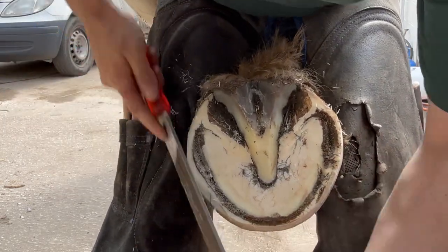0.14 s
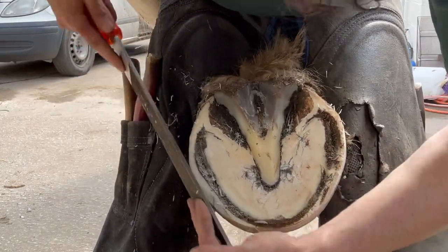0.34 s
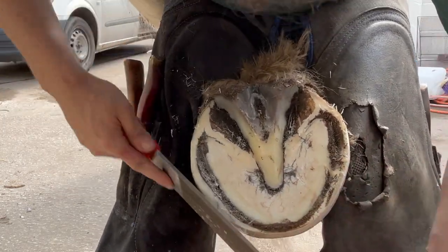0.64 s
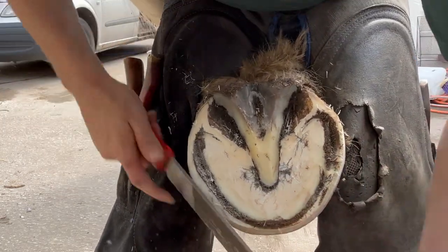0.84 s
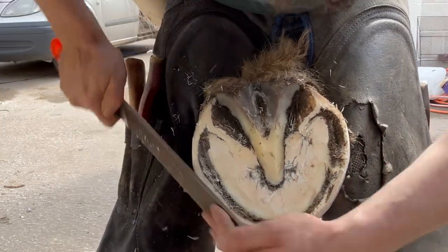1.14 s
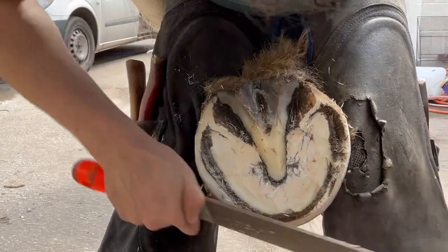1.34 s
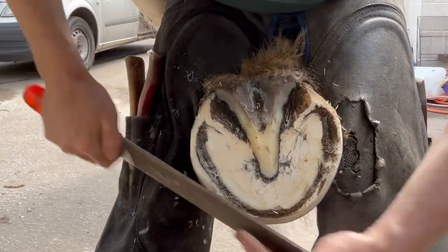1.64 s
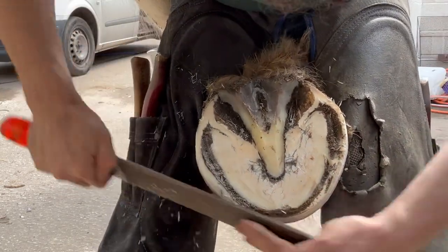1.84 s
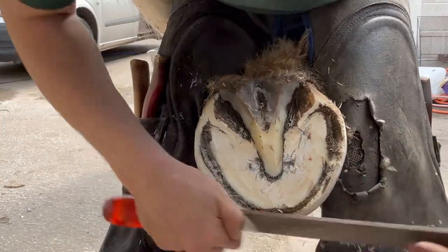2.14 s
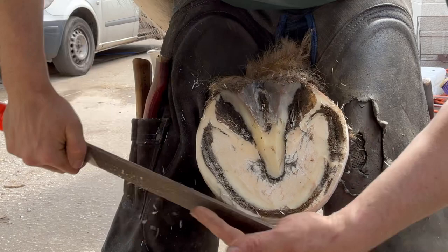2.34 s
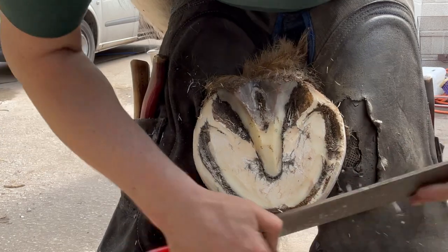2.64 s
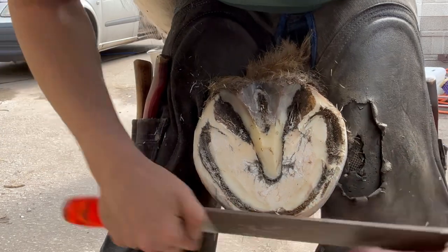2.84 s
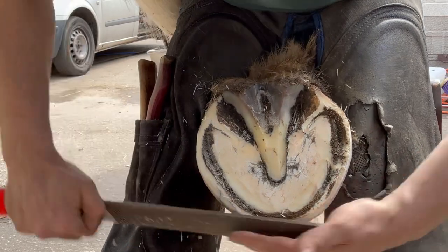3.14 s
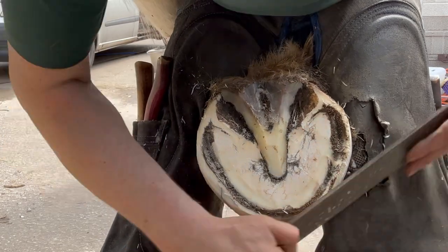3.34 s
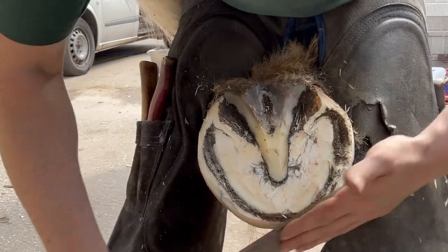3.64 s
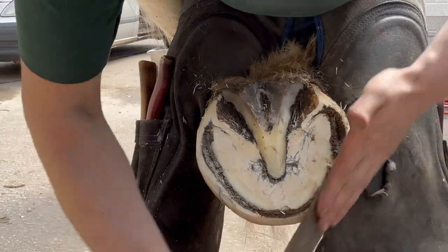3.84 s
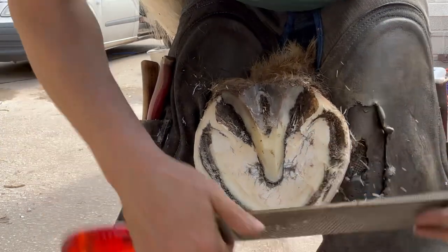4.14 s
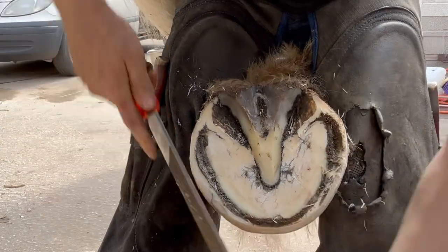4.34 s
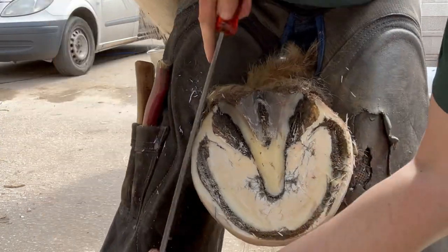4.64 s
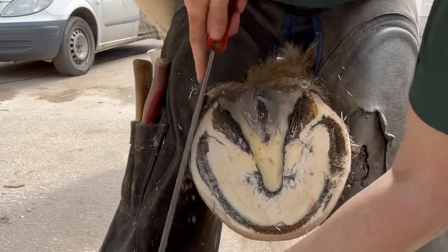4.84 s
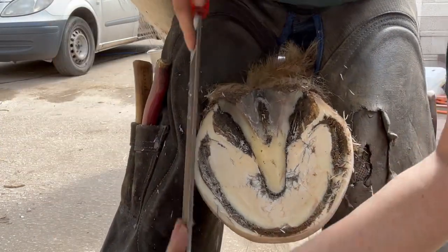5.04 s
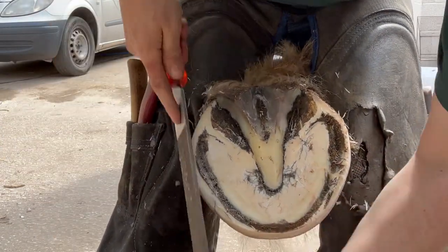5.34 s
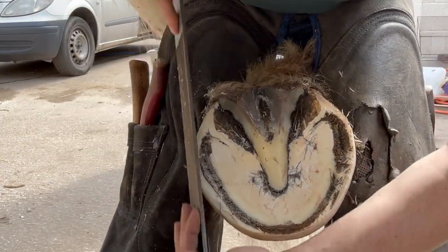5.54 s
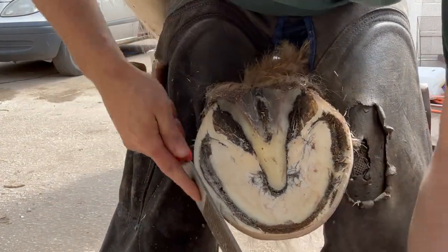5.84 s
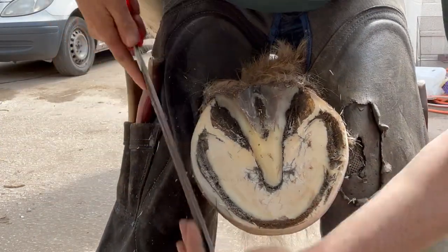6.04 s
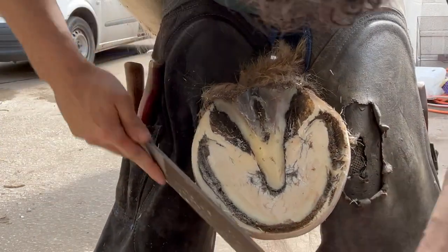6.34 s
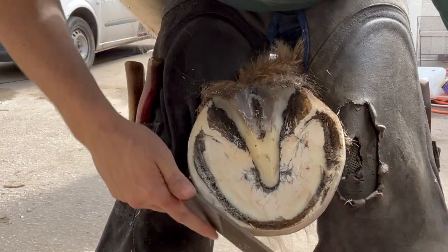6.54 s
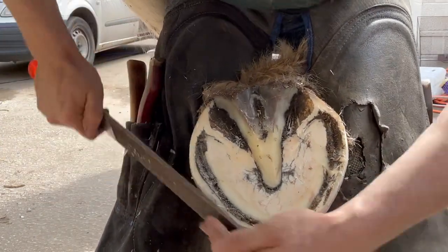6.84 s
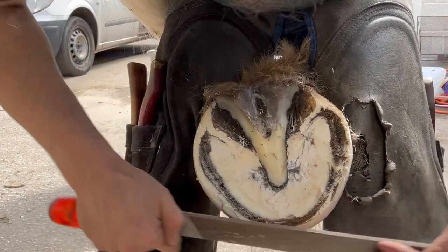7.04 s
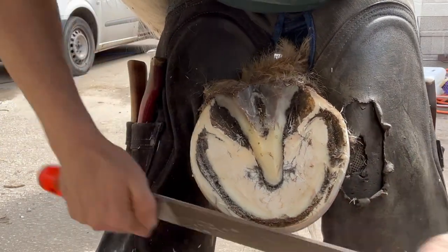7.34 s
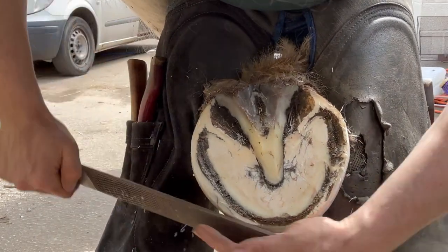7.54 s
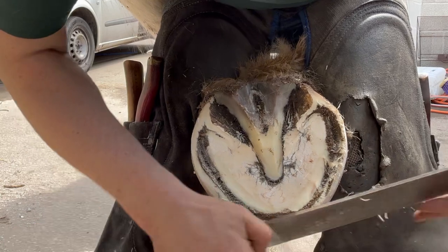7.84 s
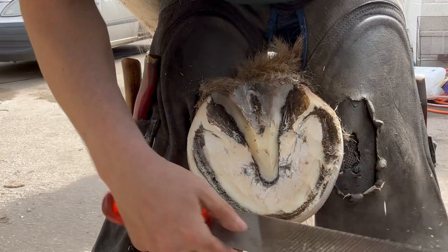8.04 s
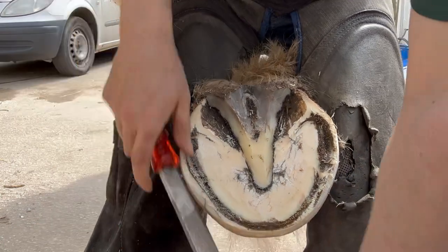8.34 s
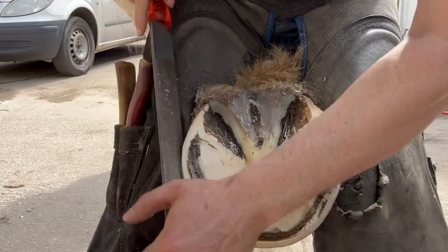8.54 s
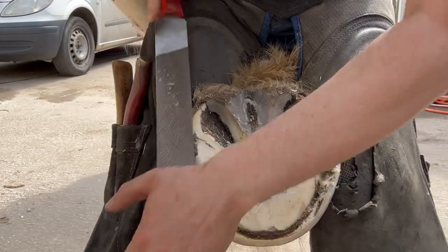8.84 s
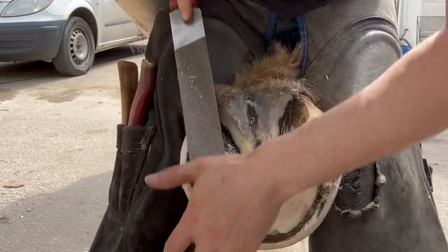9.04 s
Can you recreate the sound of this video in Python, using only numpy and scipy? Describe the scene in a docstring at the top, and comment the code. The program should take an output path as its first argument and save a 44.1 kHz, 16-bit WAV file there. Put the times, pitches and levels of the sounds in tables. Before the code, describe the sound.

Close up in a quiet open yard, a steel rasp files the edge of a horse's hoof. Short rough strokes come first, then longer, brighter, hissing ones, a brief lull, and strong juddering scrapes with low groans. More sweeping strokes follow, ending with knocks, small scrapes and one hard rasp. Shavings and leather rustle faintly. The wide stereo pickup is close, the work slightly right of centre.

```python
"""Open yard: a farrier rasps the wall of a horse's hoof, close by and a little right of centre.
Strokes speed up and slow down: tooth rows judder the hoof, horn fibres snap in dense grains, the blade sings high.
The rasp also taps on the horn, the teeth groan where they catch evenly, and the blade squeals briefly.
The held leg rumbles and heaves, shavings and leather rustle, a faint hum wavers late on; quiet air lies behind."""
import sys
import numpy as np
from scipy import signal
from scipy.fft import rfft, irfft, next_fast_len
from scipy.io import wavfile
from scipy.ndimage import uniform_filter1d, map_coordinates

SR = 44100
rng = np.random.default_rng(int(sys.argv[2]) if len(sys.argv) > 2 else 0)


def transcribe(signal):
    """Save signal, clipped to [-1, 1], as a 16-bit WAV file at the path in sys.argv[1]."""
    frames = np.atleast_2d(signal).T
    limited = np.clip(frames, -1, 1)
    pcm = np.round(limited * 32767).astype(np.int16)
    wavfile.write(sys.argv[1], SR, pcm)


N = 405719

# quiet outdoor air: (frequency [Hz], level [dB])
YARD_SHAPE = [(20, -35), (50, -10), (110, -2.5), (500, -10), (1000, -16), (2000, -22.5), (6000, -30.5),
              (15500, -75)]
# the held leg heaves: (time [s], level [dB])
LEG_HEAVES = [(.9, -52), (2.04, -48), (4.58, -54), (8.17, -48)]
# strokes of the rasp: (start [s], fastest [s], end [s], taper: under 1 flat, over 1 pointed [-], sliding [dB],
# cutting [dB], hiss [dB], judder [dB], hardest grip [s], grip length [s], change of cutting in the grip [dB],
# wall ring at full speed [Hz], wall ring [dB])
RASP_STROKES = [(-0.08, -0.049, 0.088, 2.65, -48.5, -49.5, -60, -46.5, 0.025, 0.078, 0, 2900, -61),
                (0.066, 0.092, 0.13, 0.69, -46.5, -51.5, -70, -52, 0.08, 0.095, 0, 1510, -49),
                (0.302, 0.599, 0.78, 0.38, -45, -48.5, -54.5, -41.5, 0.42, 0.084, -1, 1820, -46.5),
                (0.955, 0.968, 1.061, 1.9, -42.5, -45.5, -53.5, -41.5, 1.0, 0.045, -2, 1290, -65),
                (1.039, 1.232, 1.597, 1.44, -43.5, -48, -52.5, -45, 1.26, 0.055, 5.5, 1370, -45.5),
                (1.391, 1.661, 1.825, 3.12, -47.5, -49, -51, -38.5, 1.645, 0.055, 7.5, 2665, -46.5),
                (1.754, 1.92, 2.055, 1.05, -49.5, -46, -44, -44, 1.96, 0.084, 1, 730, -49.5),
                (2.049, 2.295, 2.375, 1.2, -53.5, -47.5, -46.5, -40, 2.25, 0.07, 1, 413, -48.5),
                (2.355, 2.575, 2.717, 1.14, -53, -46.5, -44, -40.5, 2.62, 0.079, 1.5, 2278, -56),
                (2.764, 2.838, 3.07, 0.94, -50.5, -51, -48.5, -50.5, 2.96, 0.08, 5, 1053, -63),
                (3.042, 3.291, 3.448, 1.52, -46.5, -44.5, -45, -46, 3.32, 0.083, -3.5, 637, -45.5),
                (3.461, 3.646, 3.72, 1.32, -59.5, -53.5, -52, -49.5, 3.56, 0.091, 6.5, 1205, -54.5),
                (3.701, 3.879, 4.077, 2.32, -48.5, -47, -49.5, -50.5, 3.9, 0.082, 0.5, 896.5, -49.5),
                (4.032, 4.169, 4.33, 1.43, -64.5, -66.5, -70.5, -62, 4.08, 0.07, 5.5, 1550, -59),
                (4.564, 4.62, 4.74, 1.43, -53, -53.5, -62.5, -42.5, 4.62, 0.096, 0.5, 1096, -49.5),
                (4.715, 4.747, 4.84, 1.08, -50, -57, -58.5, -43.5, 4.745, 0.048, 0, 2080, -55),
                (4.8, 4.888, 5.06, 2.9, -54.5, -55, -65, -49.5, 4.9, 0.064, -1.5, 1110, -60),
                (5.002, 5.14, 5.315, 1.86, -41.5, -44.5, -50.5, -31, 5.18, 0.092, -3.5, 2183, -61),
                (5.398, 5.43, 5.58, 1.2, -42.5, -47, -58, -44, 5.44, 0.085, -3, 4450, -49.5),
                (5.529, 5.718, 5.886, 1.12, -40, -46, -47.5, -30, 5.73, 0.17, -1, 525, -44.5),
                (5.879, 5.926, 5.94, 1.45, -57, -59.5, -72, -46.5, 5.91, 0.1, 5, 1546, -46.5),
                (6.188, 6.288, 6.58, 0.8, -41.5, -46.5, -51.5, -36, 6.275, 0.065, 1, 404.7, -57),
                (6.546, 6.599, 6.67, 3.3, -55.5, -59.5, -67.5, -51, 6.65, 0.072, -2, 1458, -66),
                (6.754, 6.769, 6.81, 0.86, -52, -51.5, -59.5, -49, 6.77, 0.044, -1, 1302, -65),
                (6.788, 7.061, 7.225, 1.17, -48.5, -44.5, -48, -37, 7.115, 0.051, -1.5, 798.4, -45.5),
                (7.225, 7.379, 7.52, 1.26, -71.5, -46.5, -50.5, -48, 7.37, 0.2, -0.5, 3002, -52.5),
                (7.525, 7.698, 7.96, 1.44, -50, -43, -47, -47.5, 7.7, 0.11, -3.5, 704.7, -50.5),
                (8.029, 8.21, 8.63, 1.51, -58, -61, -94, -49.5, 8.18, 0.092, 5.5, 2226, -55.5),
                (8.374, 8.388, 8.43, 0.59, -43.5, -44, -58, -50, 8.39, 0.032, 2, 1130, -42.5),
                (8.432, 8.491, 8.56, 0.98, -47, -45.5, -59, -52, 8.49, 0.049, 1.5, 2660, -49),
                (8.487, 8.511, 8.74, 1.5, -54, -57, -79, -37, 8.53, 0.11, 2.5, 1050, -43),
                (8.549, 8.656, 8.9, 1.78, -59, -61.5, -79, -42.5, 8.68, 0.13, -3.5, 337, -50),
                (8.752, 8.87, 8.98, 0.96, -61, -58.5, -70, -44, 8.82, 0.08, -3, 920, -55.5),
                (8.99, 9.145, 9.24, 1.58, -42.5, -39, -46.5, -33.5, 9.15, 0.038, 6, 1128, -38)]
# judder and thud of the hoof: (frequency [Hz], level [dB])
HOOF_SHAPE = [(40, -69.5), (80, -1), (125, 3.5), (230, 3), (450, -3), (700, -7.5), (1100, -22), (2500, -42),
              (6000, -103)]
# sliding on the hollow band of the hoof wall: (frequency [Hz], level [dB])
SLIDE_SHAPE = [(150, -62), (450, -6.5), (750, -11), (1050, -2), (1300, 4.5), (1550, 7.5), (1880, 3),
               (2250, -6.5), (3500, -31), (8000, -71)]
# cutting of the horn: (frequency [Hz], level [dB])
CUT_SHAPE = [(300, -23.5), (720, -0.5), (1100, -9), (1900, 3), (2700, -0.5), (3500, 1), (4500, -1.5),
             (5900, -6), (6600, -5.5), (7400, -12.5), (9500, -17.5), (15000, -14.5)]
# hiss of the rasp, also the rustle: (frequency [Hz], level [dB])
HISS_SHAPE = [(3000, -24), (6000, -6.5), (8300, -10), (10500, -8), (11700, -5.5), (12800, 1.5),
              (14500, -11.5), (15800, -4)]
# bending modes of the steel blade: (frequency [Hz], width [Hz], level [dB])
BLADE_MODES = [(2050, 29, -11.5), (4422, 71, -10), (5557, 181, -12.5), (6540, 110, -11), (12590, 95, -14),
               (13985, 110, -20)]
# two high modes that the blade sings on: (frequency [Hz], width [Hz], level [dB])
SINGING_MODES = [(11536, 24, 7), (12005, 24, 3)]
# echoes along the blade: (delay [s], strength [-])
BLADE_ECHOES = [(.00032, .35), (.0017, .45)]
# overtones of the hoof's swing, from the second harmonic up: level [dB]
SWING_OVERTONES_DB = [-14.5, -18, -27]
# the rasp landing on the horn: (time [s], level [dB], then before trims: thud [dB], knock [dB], crack [dB])
RASP_TAPS = [(0.243, -23.5, -39, -27, -7.5), (0.265, -38, -17, -18, -5), (0.866, -33.5, -20, -21, -16),
             (0.878, -31.5, -15, -27, -19), (0.965, -46, -26, -30, -12), (2.776, -41, -36, -13, -13),
             (3.493, -42.5, -15, -13, -9), (4.52, -41, -15, -12.5, -12.5), (4.736, -35.5, -22, -10.5, -18),
             (5.265, -27.5, -9, -27, -23.5), (5.373, -45.5, -11, -9.5, -20), (5.408, -29.5, -32, -11, -23),
             (5.775, -23, -15, -23, -34), (5.796, -22.5, -9.5, -13, -24), (6.114, -34, -12, -29, -19.5),
             (6.759, -31, -17.5, -17.5, -17), (7.301, -37.5, -8, -11.5, -20),
             (8.309, -17, -21.5, -16.5, -10), (8.379, -31.5, -33, -13, -10),
             (8.549, -28.5, -14.5, -15.5, -18), (8.582, -30.5, -20, -23, -13),
             (8.887, -35.5, -13, -23, -15)]
# resonances of hoof and rasp when struck: (frequency [Hz], width [Hz], level [dB])
STRUCK_MODES = [(493, 80, 10), (894, 79, 2), (1110, 360, -2), (1560, 180, 4)]
# steel crack of a tap: (frequency [Hz], level [dB])
CRACK_SHAPE = [(900, -3.5), (2000, -1.5), (2900, 0), (3300, -5.5), (5200, -6.5), (7500, -19.5),
               (10000, -28), (15800, -23)]
# even catches of the teeth: (time [s], length [s], tooth rows [1/s], glide [octaves/s], level [dB])
HOOF_GROANS = [(0.423, 0.019, 163, 4, -40), (1.25, .028, 140, 8, -41), (1.646, 0.039, 249, 0, -43),
               (1.96, 0.038, 223, -5.5, -41.5), (2.245, 0.035, 323, -2, -51), (2.61, 0.051, 164, -4, -44),
               (5.13, 0.023, 123.6, 0, -30), (5.221, .045, 150, 0, -33.5), (5.732, 0.073, 127.5, 2, -31),
               (6.274, 0.023, 128.5, 3, -36), (6.369, 0.078, 132, -0.94, -37.5),
               (7.104, 0.058, 151.5, -3, -37), (8.635, .045, 112.6, -1, -45.5),
               (8.721, 0.044, 344, -1.5, -56), (8.9, 0.083, 105, -0.4, -47), (9.172, 0.024, 221, -5, -41)]
# squeals on single blade modes: (time [s], frequency [Hz], level [dB])
BLADE_SQUEALS = [(2.592, 12005, -40), (3.25, 11536, -33), (4.755, 2062, -43), (5.11, 2062, -43),
                 (5.445, 2062, -44), (7.09, 11536, -39), (7.353, 2710, -44), (7.423, 4464, -47.5),
                 (8.52, 4464, -47.5)]
# faint hum: (time [s], frequency [Hz], level [dB])
HUM_TRACK = [(7.17, 440, -55), (7.34, 492, -60), (7.53, 473.3, -50.5), (7.62, 431.6, -60)]
# sound from the sides: (frequency [Hz], side to mid [dB])
SIDE_SHAPE = [(150, -17), (300, -7.5), (1700, -6), (2800, -2), (6000, 2), (8500, 1), (11300, -11),
              (15000, -13)]
# the right ear is louder and earlier: (frequency [Hz], level share [-], phase share [-])
RIGHT_LEAN = [(150, .09, .08), (280, .1, .2), (550, .22, .04), (1700, .05, .25), (3500, .16, .2),
              (6000, 0, 0), (11700, 0, .45), (12500, 0, .07)]

HEAVE_S, LEG_DB, ROCK_DB = 0.033, -62.5, -70  # heave length; rumble at rest; added at the height of a stroke
DRAG_DB, DRAG_WAVER_DB = -76, 8.5
# powers of the effort; cutting grows in proportion
SLIDE_POWER, HISS_POWER, JUDDER_POWER = 0.9, 1.5, 0.54
EDGE_S = 0.01  # the teeth settle on the horn and leave it
ROWS_PER_S = 185  # tooth rows at full speed
RATE_POWER, SLOWEST = 0.45, 0.12  # row rate follows this power of the speed, which is floored
UNEVEN_DB, UNEVEN_PER_S = 0.8, 26  # the hands press unevenly
EARLY_SLIDE_DB, LATE_HISS_DB = 5.5, 1.5  # start to end of a stroke: loss of sliding, gain of hiss
GRIP_DB = 11.5  # judder in the hardest grip over judder far from it
LOOSE_CYCLES, LOCKED_CYCLES = 0.3, 0.07  # timing scatter of the rows, sliding and in a groan
GROAN_CALM_DB = -3  # loose judder gives way to a groan
TEETH_PER_ROW, TEETH_SCATTER_CYCLES, TEETH_DB = 3.7, 0.02, -4.5  # level beside the grains
ECHO_OCTAVES, ECHO_PER_S = 0.25, 6  # wander of the echo delays
PATCH_HZ, PATCH_S = 600, 0.03
SING_WAVER_DB, SING_PER_S = 0.5, 30
WALL_Q, WALL_GRIP = 3.34, 0.99  # sharpness of the ring; its share in the grip's swell
WALL_BEND = 0.17  # the ring's pitch follows this power of the speed
FLECKS_PER_S, FLECK_DB, FLECK_T60_S, FLECK_SPREAD_DB = 90, -8.5, 0.15, 0.5
FLECK_HZ, FLECK_OCTAVES = 3100, 0.5  # centre and spread of pitch
SQUEAL_S = 0.015
TOP_HZ = 15850


def amp(db):
    """Decibels to gain."""
    return 10 ** (np.asarray(db) / 20)


def unit(x):
    """Scale to rms 1."""
    return x / np.sqrt(np.mean(x ** 2) + 1e-20)


def even(x, size=2600):
    """Hold the short-term rms near 1, keeping the fine grain."""
    power = uniform_filter1d(uniform_filter1d(x ** 2, size), size // 2)
    return x / np.sqrt(np.abs(power) + 1e-4 * np.mean(x ** 2))


def curves(rows):
    """One value per sample for each column after the time."""
    s, *cols = np.transpose(rows)
    return [np.interp(np.arange(N) / SR, s, c) for c in cols]


def wobble(rate):
    """A smooth random curve, rate knots a second."""
    knots = rng.standard_normal(int(N * rate / SR) + 4)
    return map_coordinates(knots, [np.arange(N) * rate / SR])


def filtered(x, response):
    """x times a complex response of frequency."""
    n = x.shape[-1]
    m = next_fast_len(n + 8192)
    return irfft(rfft(x, m) * response(np.fft.rfftfreq(m, 1 / SR)), m)[..., :n]


def coloured(x, points):
    """x through a causal minimum-phase filter with the (Hz, dB) shape."""
    size = 8192
    f, db = np.transpose(points)
    log_hz = np.log(np.fft.rfftfreq(size, 1 / SR) + 1)
    cepstrum = irfft(np.log(amp(np.interp(log_hz, np.log(f), db))))
    cepstrum[1:size // 2] *= 2
    cepstrum[size // 2 + 1:] = 0
    return signal.fftconvolve(x, irfft(np.exp(rfft(cepstrum))))[:len(x)]


def resonant(x, modes):
    """x through (Hz, width, dB) resonances of alternating sign."""
    def response(f):
        total = 0
        for k, (c, w, db) in enumerate(modes):
            total = total + (-1) ** k * amp(db) * 1j * f * w / (c * c - f * f + 1j * f * w)
        return total
    return filtered(x, response)


def scatter(x, t60, count):
    """A dense decaying response that glides through count random shapes over the scene."""
    t = np.arange(SR // 8) / SR
    place = np.linspace(0, count - 1, N)
    out = np.zeros(N + len(t))
    for k in range(count):
        a, b = np.searchsorted(place, [k - 1, k + 1])
        paths = rng.standard_normal(len(t)) * amp(-60 * t / t60)
        faded = x[a:b] * np.cos(np.pi / 2 * (place[a:b] - k))
        echo = signal.fftconvolve(faded, paths / np.linalg.norm(paths))
        out[a:][:len(echo)] += echo
    return out[:N]


def swell(s, width_s):
    """A bell-shaped rise and fall around time s."""
    return np.exp(-np.minimum(((np.arange(N) / SR - s) / width_s) ** 2, 50))


def grains(density):
    """Horn fibres snapping: random impulses of uneven size, density a second."""
    return (rng.random(N) < density / SR) * rng.standard_normal(N)


def arch(start, fastest, end, taper):
    """The samples that a stroke covers, its speed (rest, 1, rest) and the effort that goes with it."""
    at = np.arange(max(int(start * SR), 0), min(int(end * SR), N))
    t = at / SR
    speed = np.abs(np.sin(np.pi * np.interp(t, [start, fastest, end], [0, .5, 1])))
    settled = np.tanh(np.abs(np.minimum(t - start, end - t)) / EDGE_S)
    return at, speed, speed ** abs(taper) * settled ** np.clip(2 - taper, 0, 2)


def yard():
    """Quiet outdoor air: shaped noise, partly shared by both ears."""
    shared, left, right = [unit(coloured(rng.standard_normal(N), YARD_SHAPE)) for _ in range(3)]
    return amp(-61.0) * (shared + .5 * np.array([left, right]))


def leg():
    """Heavy leg and leather apron: low rumble that rocks with every stroke and heaves now and then."""
    motion = amp(LEG_DB) + sum(amp(db) * swell(s, HEAVE_S) for s, db in LEG_HEAVES)
    for start, fastest, end, taper, *_ in RASP_STROKES:
        at, speed, _ = arch(start, fastest, end, taper)
        motion[at] += amp(ROCK_DB) * speed
    rumble_shape = [(20, -32), (38, -13.0), (55, 2.0), (75, -1.0), (130, -14.0), (500, -58.0)]
    return motion * even(coloured(rng.standard_normal(N), rumble_shape))


def drag():
    """Shavings and leather: a faint, wavering rustle of grains under and between the strokes."""
    return amp(DRAG_DB + DRAG_WAVER_DB * wobble(2.84)) * unit(coloured(grains(9000), HISS_SHAPE))


def grip(at, grip_s, length_s):
    """How hard the teeth grip, 0 to 1."""
    return np.exp(-((at / SR - grip_s) / length_s) ** 2)


def strokes():
    """Gains of sliding, cutting, hiss and judder, and the pace of the tooth rows, from each stroke's speed."""
    power, rate = np.full((4, N), 1e-12), np.full(N, 1e2)
    for (start, fastest, end, taper, slide_db, cut_db, hiss_db, judder_db,
         grip_s, grip_length_s, bite_db, *_) in RASP_STROKES:
        at, speed, effort = arch(start, fastest, end, taper)
        late = (at / SR - fastest) / (end - start)
        hold = grip(at, grip_s, grip_length_s)
        slide = amp(slide_db - EARLY_SLIDE_DB * late) * effort ** SLIDE_POWER
        cut = amp(cut_db + bite_db * hold) * effort
        hiss = amp(hiss_db + LATE_HISS_DB * late) * effort ** HISS_POWER
        judder = amp(judder_db + GRIP_DB * (hold - 1)) * effort ** JUDDER_POWER
        power[:, at] += np.square([slide, cut, hiss, judder])
        rate[at] = ROWS_PER_S * np.maximum(speed, SLOWEST) ** RATE_POWER
    return np.sqrt(power) * amp(UNEVEN_DB * wobble(UNEVEN_PER_S)), rate


def tooth_rows(rate, scatter_cycles, size_db):
    """One push for each row of teeth, and the swing of the hoof in step with them."""
    turns = np.cumsum(rate * (1 + .015 * wobble(40))) / SR
    at = np.searchsorted(turns, np.arange(1, int(turns[-1])))
    chance = rng.standard_normal((N // 100, 2))[:len(at)]
    late = scatter_cycles[at] * chance[:, 0] * SR / rate[at]
    places = np.clip(at + late, 0, N - 1).astype(int)
    pushes = np.bincount(places, amp(size_db * chance[:, 1]), N)
    swing = np.zeros(N)
    for k, db in enumerate([0] + SWING_OVERTONES_DB, 1):
        level = amp(db + 3.2 * wobble(50))
        swing += level * np.sin(2 * np.pi * k * turns + 0.4 * wobble(60))
    return pushes - uniform_filter1d(pushes, size=900), unit(swing)


def fine_teeth(row_rate):
    """Single teeth tick past at a nearly even pace: a zip whose overtones glide with the stroke's speed."""
    turns = np.cumsum(TEETH_PER_ROW * row_rate * (1 + .02 * wobble(25))) / SR
    passes = np.arange(1, int(turns[-1]))
    chance = rng.standard_normal((N // 20, 2))[:len(passes)]
    at = np.interp(passes + TEETH_SCATTER_CYCLES * chance[:, 0], turns, np.arange(N))
    ticks = np.bincount(at.astype(int), amp(2 * chance[:, 1]), N)
    return even(ticks - uniform_filter1d(ticks, size=200))


def swept(x):
    """Blade echoes of randomly shifting delay sweep peaks and notches through the scrape."""
    at = np.arange(N)
    for delay_s, strength in BLADE_ECHOES:
        delay = delay_s * SR * 2 ** (ECHO_OCTAVES * wobble(ECHO_PER_S))
        x = x + strength * np.interp(at - delay, at, x)
    return x


def patchy(x, depth_db):
    """The grip changes from moment to moment: each band brightens and dims on its own."""
    z = signal.stft(x, nperseg=256)[2]
    cell = np.array([PATCH_HZ * 256 / SR, PATCH_S * SR / 128])[:, None, None]
    place = np.indices(z.shape) / cell
    knots = rng.standard_normal(place[:, -1, -1].astype(int) + 2)
    field = map_coordinates(knots, place, order=1)
    return signal.istft(z * amp(depth_db * unit(field)), nperseg=256)[1][:N]


def wall_ring(snaps):
    """Each stroke meets another part of the wall, which rings at its own pitch, bent by the speed."""
    out = np.zeros(N)
    for start, fastest, end, taper, *_, grip_s, grip_length_s, _, ring_hz, ring_db in RASP_STROKES:
        at, speed, effort = arch(start, fastest, end, taper)
        mode = [(ring_hz, ring_hz / WALL_Q, 0)]
        ring = resonant(resonant(snaps[at], mode), mode)
        bent = unit(map_coordinates(ring, [np.cumsum(np.maximum(speed, SLOWEST) ** WALL_BEND)]))
        hold = grip(at, grip_s, grip_length_s)
        out[at] += amp(ring_db + WALL_GRIP * GRIP_DB * (hold - 1)) * effort * bent
    return out


def flecks():
    """Now and then one tooth bites harder: a short decaying sine at a pitch of its own."""
    t = np.arange(SR // 10) / SR
    out = np.zeros(N + len(t))
    for at in np.flatnonzero(rng.random(N) < FLECKS_PER_S / SR):
        pitch, size = np.clip(rng.standard_normal(2), -2, 2)
        hz = FLECK_HZ * 2 ** (FLECK_OCTAVES * pitch)
        out[at:][:len(t)] += amp(FLECK_SPREAD_DB * size - 60 * t / FLECK_T60_S) * np.sin(2 * np.pi * hz * t)
    return amp(FLECK_DB) * unit(out[:N])


def rasp():
    """Tooth rows shake the hoof; single teeth and bursts of grains ring horn and blade."""
    (sliding, cutting, hissing, shaking), free_rate = strokes()
    rate, locked, groaning = groans(free_rate)
    scatter_cycles = LOOSE_CYCLES + locked * (LOCKED_CYCLES - LOOSE_CYCLES)
    rows, swing = tooth_rows(rate, scatter_cycles, size_db=4.0)
    release = signal.lfilter([1], [1, -np.exp(-1 / (0.00022 * SR))], np.maximum(rows, 0))
    contact = (0.5 + release) * amp(1.24 * wobble(45))  # the blade rocks under the hands
    teeth = amp(TEETH_DB) * unit(contact * fine_teeth(free_rate))

    def snaps():
        return contact * grains(6000)

    def travelling(x):
        # resonances shift as the contact point travels along the blade
        return x + 1.27 * scatter(x, t60=0.022, count=120)

    def bites():
        return travelling(unit(snaps()) + teeth)

    shake = even(coloured(unit(rows) + 1.4 * unit(travelling(snaps())), HOOF_SHAPE))
    slide = even(coloured(swept(bites()), SLIDE_SHAPE))
    cut = even(coloured(patchy(bites(), depth_db=2.5), CUT_SHAPE))
    hiss = even(coloured(patchy(bites(), depth_db=5.0), HISS_SHAPE))
    sing = resonant(snaps(), BLADE_MODES)
    for mode in SINGING_MODES:  # each wavers on its own
        sing = sing + resonant(snaps(), [mode]) * amp(SING_WAVER_DB * wobble(SING_PER_S))
    sing = even(unit(sing), size=4000)
    hoof = amp(GROAN_CALM_DB * locked) * shaking * shake + groaning * swing
    horn = sliding * slide + cutting * (cut + flecks()) + wall_ring(snaps())
    blade = hissing * hiss + amp(9) * hissing ** 1.201 * sing  # the faster, the more it sings
    return hoof + horn + blade


def burst(t60, attack):
    """The rattle of one short contact: decaying random signs."""
    t = np.arange(SR // 4) / SR
    return rng.choice([-1, 1], len(t)) * amp(-60 * t / t60) * (1 - np.exp(-t / attack))


def broadband(x):
    """Level the spectrum of a burst: a hard contact excites all frequencies alike."""
    power = np.abs(uniform_filter1d(np.abs(rfft(x)) ** 2, size=50))
    return coloured(x, np.column_stack([np.fft.rfftfreq(len(x), 1 / SR) + 1, -10 * np.log10(power)]))


def taps():
    """Each landing gives a dull thud in the leg, a knock in the horn and a steel crack."""
    def strength(x):
        # same energy as 20 ms at rms 1
        return x / np.sqrt(np.sum(x ** 2) / (.02 * SR))

    out = np.zeros(N + SR)
    for s, level_db, thud_db, knock_db, crack_db in RASP_TAPS:
        thud = strength(coloured(burst(0.068, attack=0.0054), HOOF_SHAPE))
        knock = strength(resonant(burst(.04, attack=.0003), STRUCK_MODES))
        snap = broadband(burst(.028, attack=.0006))
        steel = strength(resonant(snap, BLADE_MODES + SINGING_MODES))
        crack = strength(coloured(snap, CRACK_SHAPE)) + amp(-20.5) * steel
        tap = amp(thud_db + 2.5) * thud + amp(knock_db + 0.5) * knock + amp(crack_db - 5.5) * crack
        out[round((s + .001) * SR):][:len(tap)] += amp(level_db) * tap
    return out[:N]


def groans(rate):
    """Teeth lock to an even, gliding pace: the pace, how firmly they lock and the gain of the hoof's swing."""
    t = np.arange(N) / SR
    locked, gain = np.zeros(N), np.zeros(N)
    for s, length_s, rows_per_s, glide, db in HOOF_GROANS:
        bell = swell(s, length_s)
        hold = np.minimum(4 * bell, 1)
        pace = rows_per_s * 2 ** np.clip(glide * (t - s), -1, 1)
        rate = rate + hold * (pace - rate)
        locked = np.maximum(locked, hold)
        gain = gain + amp(db) * bell
    return rate, locked, gain


def squeals():
    """For a moment the teeth keep one mode of the blade swinging: a sine with a straying phase."""
    t = np.arange(N) / SR
    stray = .5 * wobble(160)
    out = np.zeros(N)
    for s, hz, db in BLADE_SQUEALS:
        out += amp(db) * swell(s, SQUEAL_S) * np.sin(2 * np.pi * hz * t + stray)
    return np.sqrt(2) * out


def faint_tone():
    """A soft hum for about half a second: one sine, wavering in pitch and level."""
    hz, db = curves(HUM_TRACK)
    t = np.arange(N) / SR
    on = uniform_filter1d(1. * ((t > HUM_TRACK[0][0]) & (t < HUM_TRACK[-1][0])), size=1500)
    level = on * amp(db + 1.27 * wobble(38))
    turns = np.cumsum(hz * (1 + 0.013 * wobble(42))) / SR
    return level * np.sqrt(2) * np.sin(2 * np.pi * turns)


def leaning(hz):
    """The part that differs between the ears because the work is off centre."""
    f, level, phase = np.transpose(RIGHT_LEAN)
    return np.interp(hz, f, level) + 1j * np.interp(hz, f, phase)


def scene():
    """The work sits a little right of centre; apron, arms and ground widen it."""
    work = rasp() + taps() + drag()
    nearby = scatter(work, t60=.03, count=90)
    ground = scatter(work, t60=0.1, count=24)
    mid = work + amp(-13.5) * ground + squeals() + leg() + faint_tone()
    side = coloured(nearby, SIDE_SHAPE) - filtered(mid, leaning)
    return np.array([mid + side, mid - side]) + yard()


def record(dry):
    """Remove everything above the band limit."""
    return filtered(dry, lambda hz: hz < TOP_HZ)


dry = scene()
out = record(dry)
transcribe(out)
```